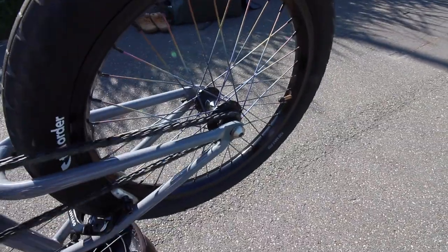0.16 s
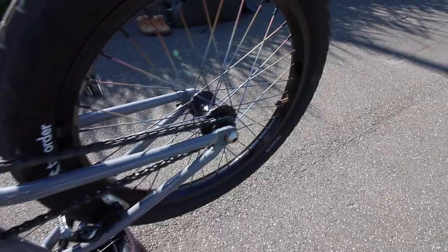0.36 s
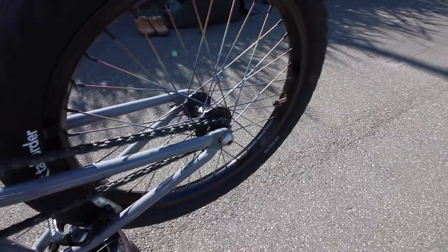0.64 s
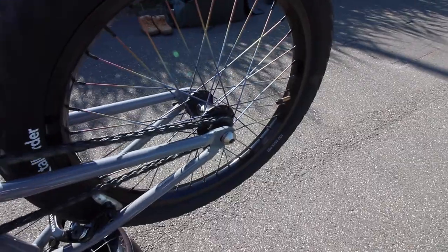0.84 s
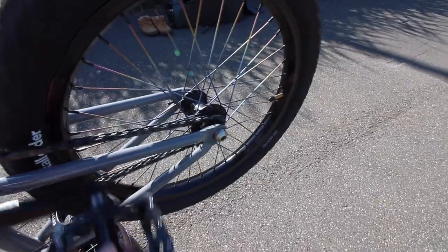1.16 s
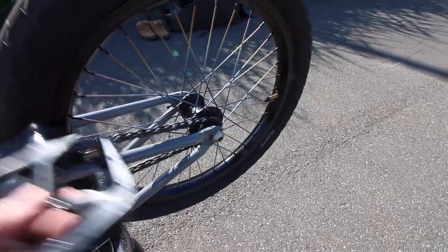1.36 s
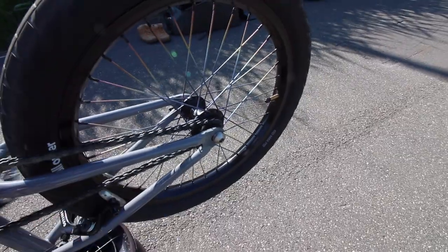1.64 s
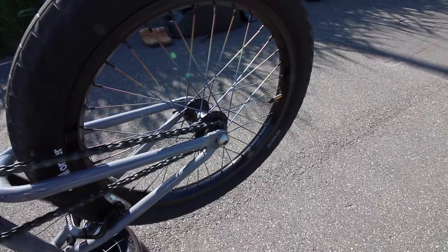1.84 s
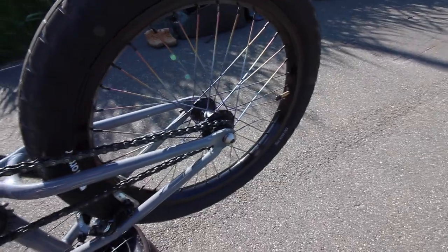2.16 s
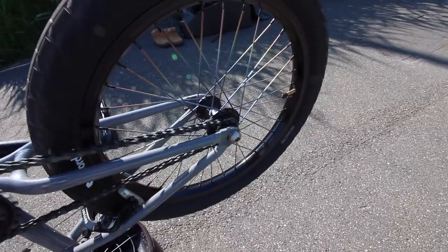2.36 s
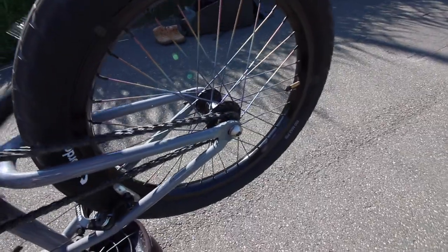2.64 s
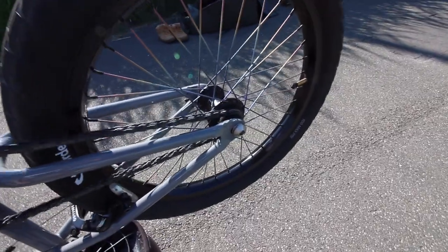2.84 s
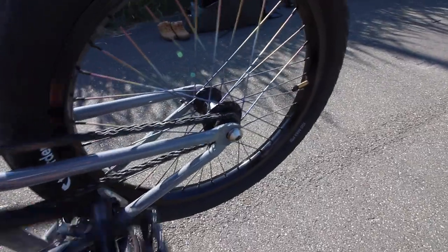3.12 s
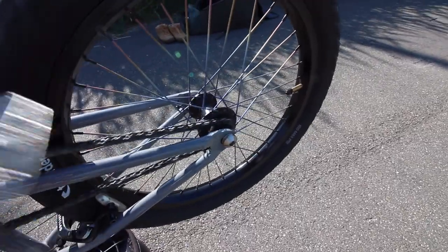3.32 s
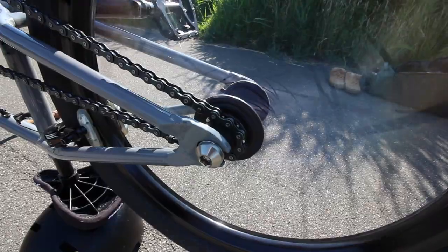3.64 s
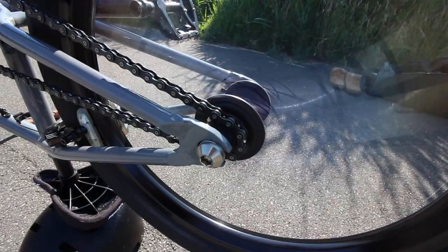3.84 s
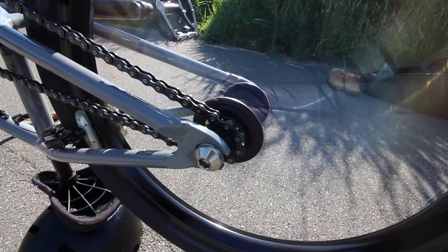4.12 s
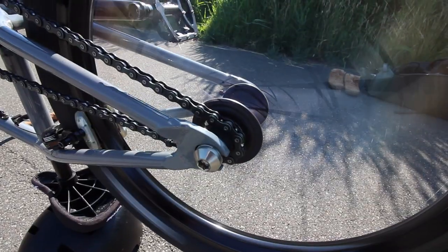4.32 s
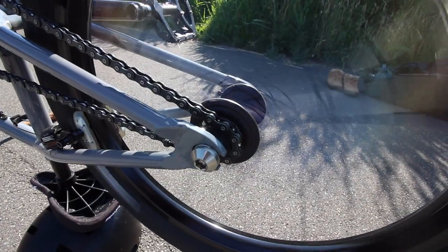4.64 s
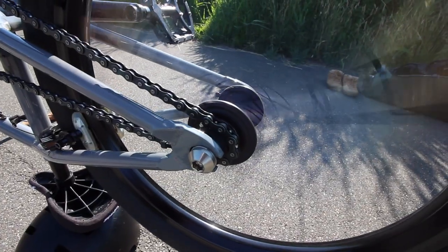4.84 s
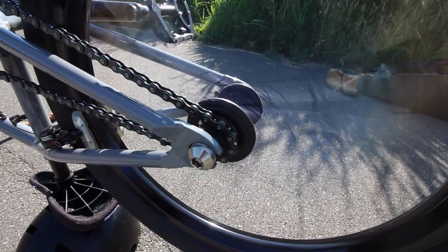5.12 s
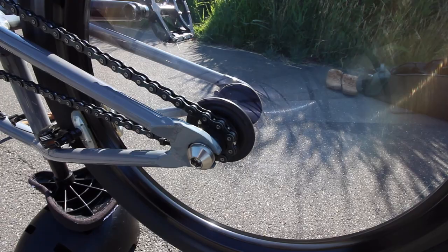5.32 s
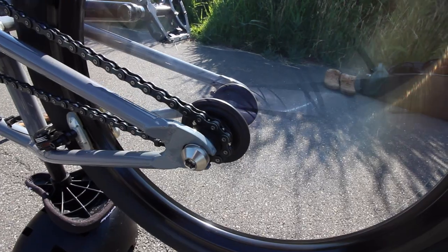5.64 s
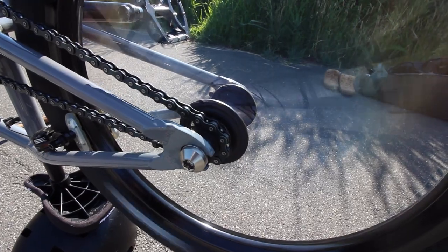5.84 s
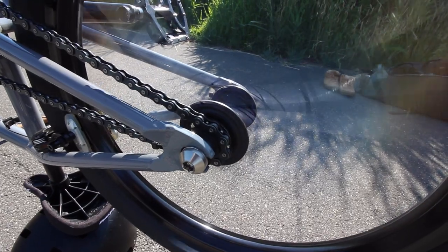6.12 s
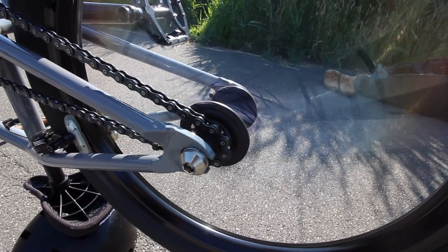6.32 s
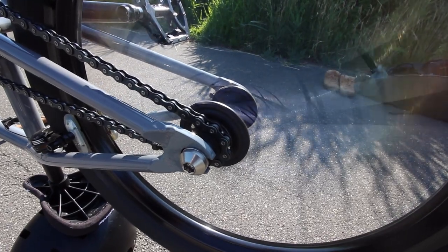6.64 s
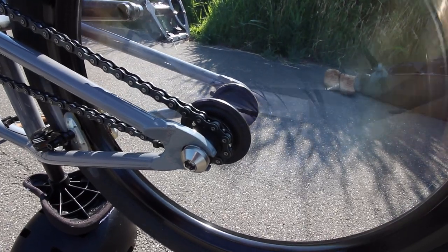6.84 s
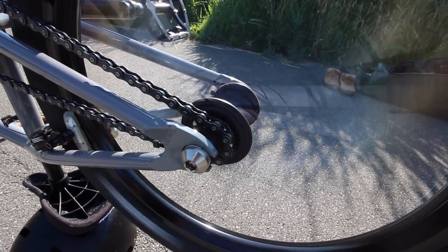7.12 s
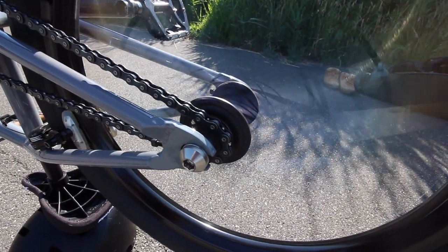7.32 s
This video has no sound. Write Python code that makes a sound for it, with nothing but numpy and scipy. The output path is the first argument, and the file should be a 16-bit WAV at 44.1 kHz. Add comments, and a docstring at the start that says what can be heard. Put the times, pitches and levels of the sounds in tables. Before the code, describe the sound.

Outdoors, a bicycle's rear hub ratchets as the cranks are swung by hand. Heard from a little distance, the bright buzz rises and falls and once slows to single clicks, while wind rumbles on the microphone. Then, suddenly close to the hub, the wheel coasts with a faster, even buzz that sinks slightly in pitch, the frame ringing in soft swells. Faint background noise and a low hum lie underneath.

```python
"""Outdoors, a bicycle on a stand: the rear hub's pawls tick over the ratchet ring and excite
shell, spokes and frame. First, from a distance, the cranks are swung by hand: the buzz rises, falls
and once slows to single clicks, with wind on the microphone. Then, close beside the hub, the wheel
coasts: a fast even buzz sinks as it slows and rings the frame in swells twice a turn.
Background noise and a faint low hum lie under both."""
import sys
import numpy as np
from scipy import signal
from scipy.fft import rfft, irfft, next_fast_len
from scipy.io import wavfile
from scipy.ndimage import uniform_filter1d

SR = 44100
rng = np.random.default_rng(int(sys.argv[2]) if len(sys.argv) > 2 else 0)


def int16_out(signal):
    """Quantize to a 16-bit WAV file."""
    q = np.round(np.clip(np.atleast_2d(signal).T, -1, 1) * 32767)
    wavfile.write(sys.argv[1], SR, q.astype(np.int16))


N = 329868
T = np.arange(N) / SR
FFT_SIZE = next_fast_len(N + SR // 2, True)
HZ = np.fft.rfftfreq(FFT_SIZE, 1 / SR)
TEETH_PER_TURN, COAST_START_S = 148, 3.6

# Ratchet speed under hand cranking. Each row: time in seconds, teeth per second.
SWING_RATE = [(0.0, 214), (0.13, 220), (0.3, 345.0), (0.42, 240.0), (0.8, 245.0), (1.08, 346),
              (1.18, 195.0), (1.3, 280), (1.42, 191), (1.62, 254), (1.84, 240), (1.97, 142), (2.19, 31.0),
              (2.29, 96), (2.4, 240.0), (2.51, 157), (2.63, 277), (3.07, 323), (3.2, 440.0), (3.42, 297),
              (3.52, 315.0), (3.6, 220)]
# Extra gain of the pawl band near 9.5 kHz. Each row: time in seconds, gain in dB.
PAWL_GAIN = [(0, 1), (.18, 2.5), (.4, 0), (1.0, 0.5), (1.4, -1), (2.3, -1), (2.85, 0.5), (3.6, -1)]
# Brief flares of single resonances. Each row: peak time in seconds, half length in seconds,
# centre in Hz, half width in Hz, lift in dB.
MODE_FLARES = [(.56, 0.019, 965, 110, 12), (1.66, .13, 1813, 49.7, 8), (1.70, .03, 965, 110, 12.5),
               (3.25, .4, 12630, 220.3, 5), (3.481, 0.035, 965, 110, 7)]
# Single pawl drops. Each row: time in seconds, relative force in dB.
PAWL_DROPS = [(2.0662, -7), (2.079, -7), (2.092, -5.5), (2.1083, -2.5), (2.127, -2.5), (2.153, -5.5),
              (2.185, -4), (2.2162, -4), (2.2408, -4.5), (2.258, -5), (2.2714, -3), (2.2822, -4)]
# Broad hub colour, far and near. Each row: frequency in Hz, gain in dB.
FAR_COLOUR = [(150, -21.5), (500, -45.5), (800, -24), (1200, -18), (1550, -19), (2100, -9.5), (2700, 2.5),
              (3300, -1), (4600, -5.5), (5600, -5), (7600, -7.5), (9400, 4), (11500, -1), (15500, -1.5)]
NEAR_COLOUR = [(150, -48), (500, -20), (750, -18.5), (1050, -14), (1300, -17.5), (1700, -12), (2500, 0),
               (3300, 2.5), (4700, -6), (5600, -3), (7400, -10.5), (9300, -7.5), (12500, -4), (15500, -4)]
# Shell, spoke and frame modes, far and near. Each row: centre in Hz, width in Hz, lift in dB.
FAR_RESONANCES = [(941.6, 48, 16), (1240, 22, 9), (1504, 29, 12), (1734, 145, 10.5), (1840, 38, 10.5),
                  (2113, 32, 13), (2500, 17, -3.5), (2532, 6.7, 14.5), (3270, 25, 11.5), (3500, 14, 8),
                  (3840, 43, 5), (4195, 110, 4.5), (5240, 45, 9), (5465, 170, 5), (7030, 56, 3),
                  (8750, 130, 7.5), (9380, 330, 3.5), (10000, 240, 4), (12500, 160, -3), (13900, 240, 4)]
NEAR_RESONANCES = [(935.4, 67, 12.1), (1460, 280, 5), (1808, 46, 7.7), (1943, 19, 8.5), (2205, 13, 10.3),
                   (2160, 40, 1.1), (2572, 40, 7.3), (3210, 60, 3.6), (3466, 18, 8.3), (3970, 69, 3.9),
                   (4165, 78, 9.3), (4930, 190, 5.8), (5540, 94, 2.2), (6020, 187, 2.8), (9100, 970, 5.1),
                   (14300, 250, 1.5)]
# Wind rumble and background level; the background swells as the recorder's gain rises while the
# ratchet goes quiet. Each row: time in seconds, base rumble level in dB, base background level in dB.
RUMBLE_AND_BACKGROUND = [(0.2, -42.5, -46.5), (1.59, -39, -42.5), (1.75, -31, -41.5), (1.93, -36, -43.5),
                         (2.09, -31, -37), (2.23, -32.5, -35.5), (2.41, -49, -42.5), (2.6, -39.5, -41.5),
                         (3.55, -56, -45)]
# Wind rumble, far background and calm air. Each row: frequency in Hz, relative density in dB.
RUMBLE_SPECTRUM = [(12, -28), (22, 2.5), (45, -4.5), (70, -4.5), (100, -5), (135, -7), (220, -28),
                   (400, -39)]
BACKGROUND_SPECTRUM = [(60, -6), (150, 7.5), (220, 5.5), (350, -2.5), (800, 3), (1120, 6.5), (1500, -5.5),
                       (3200, -0.5), (5500, -27), (15000, -42)]
CALM_SPECTRUM = [(12, -42), (20, -8), (145, -4), (193, -3), (254, -13), (317, -7.5), (370, -22),
                 (450, -5.5), (580, -35), (990, -120)]
# Faint hum, far and near. Each row: frequency in Hz, rms level in dB.
FAR_HUM_LINES = [(70, -48.5), (414, -55.5)]
NEAR_HUM_LINES = [(199.2, -47), (312.2, -61.5), (597.5, -58.5)]


def cranked_buzz():
    """Hand-swung ratchet: louder and brighter with speed, muted while the pawls click singly."""
    tooth_hz = curve(SWING_RATE)
    hand_tremor = .025 * drift(14)
    blows = tooth_blows(tooth_hz * (1 + hand_tremor), jitter_s=.00008, uneven_db=1, wear_db=-.5)
    blows *= (T < PAWL_DROPS[0][0] - .005) | (T > PAWL_DROPS[-1][0] + .005)
    buzz = hub(blows, FAR_COLOUR, FAR_RESONANCES, push_hz=1300, push_db=5.5,
               chatter_s=.0018, ring_s=.01, ring_db=-1, treble_ring_db=-7)
    buzz = pawl_travel(buzz, depth_db=2.6)
    doublings = np.log2(tooth_hz / 250)
    buzz = balance(buzz, shell_db=-21 + 1.2 * doublings,
                   pawl_db=-24.5 + 3 * doublings + curve(PAWL_GAIN), sizzle_db=-28 + 2.5 * doublings)
    buzz *= gain_of(.8 * drift(5.5))
    return flares(frame_ring(buzz, level_db=-36.5))


def coasting_buzz():
    """Free wheel slowing exponentially; the ratchet runs out of true, so buzz and frame ring swell."""
    start_hz, drag_per_s = 515.3, .0305
    tooth_hz = start_hz * np.exp(-drag_per_s * (T - COAST_START_S))
    turns = (start_hz - tooth_hz) / drag_per_s / TEETH_PER_TURN
    flutter = .006 * drift(30)  # play in the driver
    blows = tooth_blows(tooth_hz * (1 + flutter), jitter_s=.00003, uneven_db=2.28, wear_db=.5)
    blows *= T > COAST_START_S
    buzz = hub(blows, NEAR_COLOUR, NEAR_RESONANCES, push_hz=1600, push_db=3,
               chatter_s=.0011, ring_s=.012, ring_db=3, treble_ring_db=.5)
    buzz = pawl_travel(buzz, depth_db=1.67)
    buzz = balance(buzz, shell_db=-23.5, pawl_db=-25.5, sizzle_db=-28)
    wobble_db = .3 * np.cos(2 * np.pi * (turns - .95))
    buzz *= gain_of(wobble_db + .5 * drift(5.6))
    # The second harmonic sinks into the frame's resonance.
    frame_hz, half_width_hz = 944.5, 24
    in_tune = 1 / (1 + ((2 * tooth_hz - frame_hz) / half_width_hz) ** 2)
    swell_db = 5.5 + 4.5 * np.cos(4 * np.pi * (turns - .11))
    return frame_ring(buzz, level_db=-38.5 + in_tune * swell_db)


def single_clicks(rms_db):
    """The cranks almost keep up with the wheel: the pawls drop one tooth at a time."""
    time_s, force_db = np.transpose(PAWL_DROPS)
    blows = np.bincount(np.round(time_s * SR).astype(int), gain_of(force_db), N)
    clicks = hub(blows, FAR_COLOUR, FAR_RESONANCES, push_hz=1300, push_db=4,
                 chatter_s=.002, ring_s=.0061, ring_db=6, treble_ring_db=-11)
    return gain_of(rms_db) * unit_rms(clicks)


def tooth_blows(tooth_hz, jitter_s, uneven_db, wear_db):
    """One impulse per tooth at even mean power; the wear pattern repeats each turn."""
    onsets = np.flatnonzero(np.diff(np.floor(np.cumsum(tooth_hz) / SR)))
    lag, force = rng.standard_normal((len(onsets), 2)).T
    wear = rng.standard_normal(TEETH_PER_TURN)[np.arange(len(onsets)) % TEETH_PER_TURN]
    strength = unit_rms(gain_of(uneven_db * force + wear_db * wear)) * np.sqrt(SR / tooth_hz[onsets])
    jittered = np.round(onsets + jitter_s * SR * lag).astype(int)
    return np.bincount(np.clip(jittered, 0, N - 1), strength, N)


def hub(blows, colour, modes, push_hz, push_db, chatter_s, ring_s, ring_db, treble_ring_db):
    """Each blow: a low push, bright pawl chatter and a longer ring, all through the hub's modes."""
    low_share = 1 / (1 + (HZ / push_hz) ** 4)
    push = shaped(blows, gain_of(push_db) * np.sqrt(low_share))
    chatter = shaped(rattle(blows, rise_s=.00053, decay_s=chatter_s), np.sqrt(1 - low_share))
    tilt_db = spectrum_db([(3500, ring_db), (7000, treble_ring_db)], HZ)
    ring = shaped(rattle(blows, rise_s=.004, decay_s=ring_s), gain_of(tilt_db))
    hz = abs(np.fft.fftfreq(8192, 1 / SR))
    modes_db = sum(lift / (1 + (2 * (hz - centre) / width) ** 2) for centre, width, lift in modes)
    log_gain = np.log(gain_of(spectrum_db(colour, hz) + modes_db))
    # Minimum phase: the body rings only after the blow.
    body = np.fft.ifft(np.exp(np.conj(signal.hilbert(log_gain)))).real[:4096]
    return signal.oaconvolve(push + chatter + ring, body)[:N]


def rattle(blows, rise_s, decay_s):
    """Dense random vibration swells and dies after each blow."""
    t = T[:6000]
    burst = (1 - np.exp(-t / rise_s)) ** 2 * np.exp(-2 * t / decay_s)
    power = signal.oaconvolve(blows ** 2, burst / burst.sum())[:N]
    return np.sqrt(abs(power)) * rng.standard_normal(N)


def pawl_travel(buzz, depth_db):
    """Pawls moving round the ring favour changing patches of the upper modes."""
    hz, _, frames = signal.stft(buzz, SR, nperseg=512, noverlap=384)
    patches = unit_rms(uniform_filter1d(rng.standard_normal(frames.T.shape), size=40, axis=0)).T
    upper = np.clip(hz / 2500, 0, 1)[:, None] ** 2
    return signal.istft(frames * gain_of(depth_db * upper * patches), nperseg=512, noverlap=384)[1][:N]


def balance(buzz, shell_db, pawl_db, sizzle_db):
    """Levels three bands: shell below, pawl ring near 9.5 kHz, sizzle on top."""
    below_pawls = 1 / (1 + (HZ / 7800) ** 16)
    below_sizzle = 1 / (1 + (HZ / 10800) ** 24)
    shell = shaped(buzz, below_pawls) / band_rms(buzz, 1500, 6000)
    pawls = shaped(buzz, below_sizzle - below_pawls) / band_rms(buzz, 8300, 10800)
    sizzle = shaped(buzz, 1 - below_sizzle) / band_rms(buzz, 10800, 15500)
    return gain_of(shell_db) * shell + gain_of(pawl_db) * pawls + gain_of(sizzle_db) * sizzle


def frame_ring(buzz, level_db):
    """Pulls the frame's band near 950 Hz towards an rms level."""
    ring = shaped(buzz, np.exp(-((HZ - 965) / 125) ** 4))
    running_rms = np.sqrt(np.maximum(uniform_filter1d(ring ** 2, 9000), np.mean(ring ** 2) / 3))
    return buzz + ring * (gain_of(level_db) / running_rms - 1)


def flares(buzz):
    """Single resonances stand out of the buzz and sink back."""
    return buzz + sum(shaped(buzz, bell(HZ, hz, half_hz)) * (gain_of(db * bell(T, peak_s, half_s)) - 1)
                      for peak_s, half_s, hz, half_hz, db in MODE_FLARES)


def wind():
    """Gusts rumble on the microphone; the strongest boom."""
    rumble_db = curve(RUMBLE_AND_BACKGROUND)
    rumble = gain_of(rumble_db - .5 + drift(5)) * noise(RUMBLE_SPECTRUM, 20, 110)
    boom_db = -31 + 2.7 * (rumble_db - rumble_db.max())
    boom = gain_of(boom_db) * unit_rms(shaped(rng.standard_normal(N), bell(HZ, 68, 22)))
    return rumble + boom


def background():
    """Outdoor noise on a set level curve: it swells with the recorder's gain in the ratchet's lull."""
    return gain_of(curve(RUMBLE_AND_BACKGROUND, column=2) + 1) * noise(BACKGROUND_SPECTRUM, 250, 750)


def calm_air(level_db):
    """Steady low noise."""
    return gain_of(level_db) * noise(CALM_SPECTRUM, 20, 237)


def hum(lines, waver_rad):
    """Steady low tones, wavering in phase."""
    return sum(np.sqrt(2) * gain_of(db) * np.sin(2 * np.pi * hz * T + waver_rad * drift(13))
               for hz, db in lines)


def noise(spectrum, lo_hz, hi_hz):
    """Coloured noise, rms 1 within the band."""
    x = shaped(rng.standard_normal(N), gain_of(spectrum_db(spectrum, HZ)))
    return x / band_rms(x, lo_hz, hi_hz)


def drift(rate_hz):
    """Slow random motion, rms 1."""
    return unit_rms(shaped(rng.standard_normal(N), bell(HZ, 0, rate_hz)))


def curve(rows, column=1):
    """Table column, interpolated over time."""
    rows = np.array(rows)
    return np.interp(T, rows[:, 0], rows[:, column])


def spectrum_db(points, hz):
    """Spectrum, interpolated over log frequency."""
    point_hz, db = np.transpose(points)
    return np.interp(np.log(hz + 1), np.log(point_hz + 1), db)


def shaped(x, gain):
    """Zero-phase filter, one gain per frequency."""
    return irfft(rfft(x, FFT_SIZE) * gain, FFT_SIZE)[:N]


def band_rms(x, lo_hz, hi_hz):
    return shaped(x, (HZ > lo_hz) & (HZ < hi_hz)).std()


def bell(x, centre, half_width):
    return np.exp(-((x - centre) / half_width) ** 2)


def unit_rms(x):
    return x / np.sqrt(np.mean(x ** 2) + 1e-20)


def gain_of(db):
    return 10 ** (np.asarray(db) / 20)


def scene():
    """Far cranking, then near coasting; both channels alike."""
    far = cranked_buzz() + single_clicks(rms_db=-37)
    far += wind() + background() + hum(FAR_HUM_LINES, waver_rad=.6)
    near = coasting_buzz() + calm_air(level_db=-48.5) + hum(NEAR_HUM_LINES, waver_rad=.25)
    return np.tile(np.where(T < COAST_START_S, far, near), (2, 1))


def record(dry):
    """Low cut at 15 Hz, band limit at 15.9 kHz."""
    low_cut = signal.butter(2, 15, "highpass", fs=SR, output="sos")
    band_limit = signal.firwin(601, 15900, window=("kaiser", 9), fs=SR)
    return signal.oaconvolve(signal.sosfilt(low_cut, dry), band_limit[None], "same")


dry = scene()
out = record(dry)
int16_out(out)
```